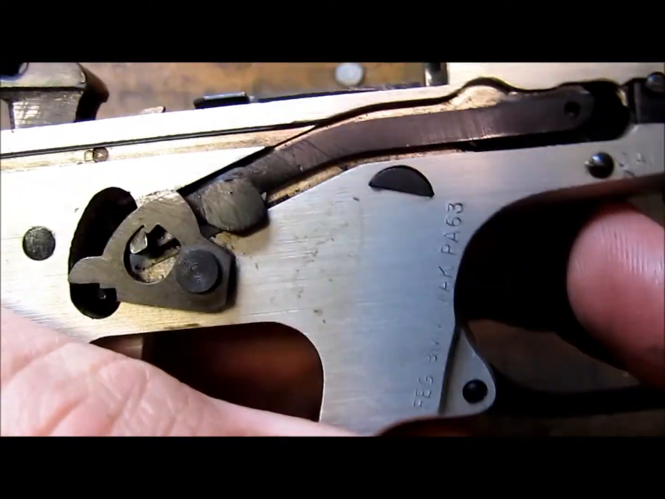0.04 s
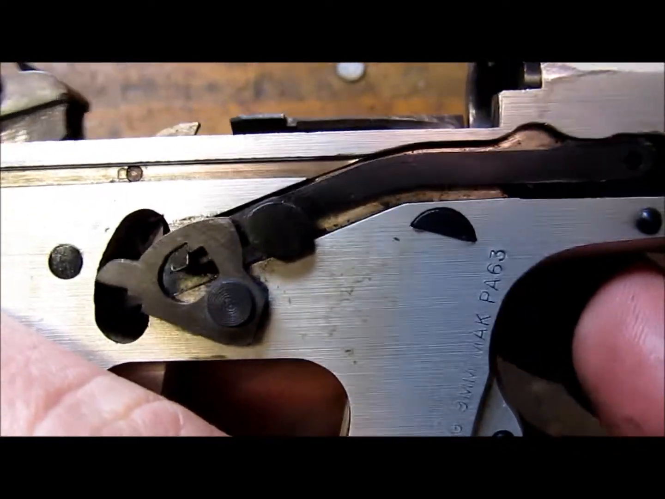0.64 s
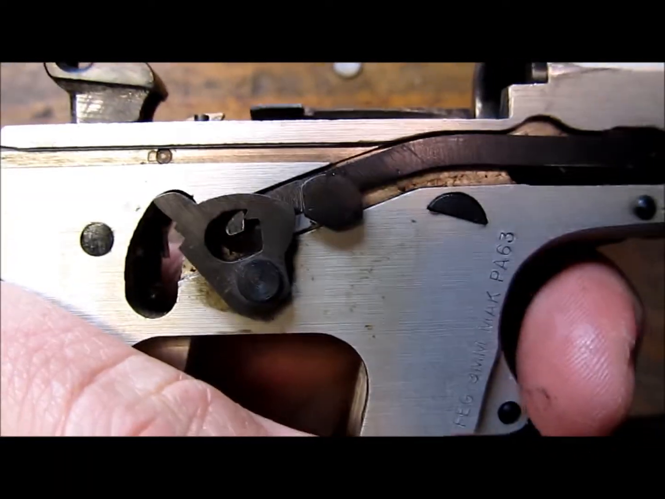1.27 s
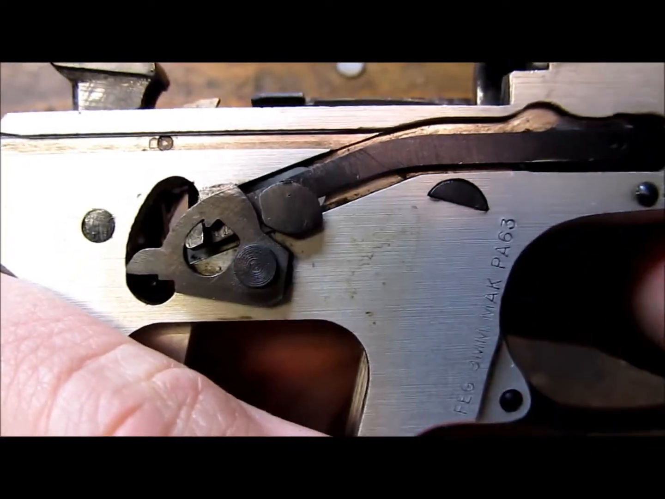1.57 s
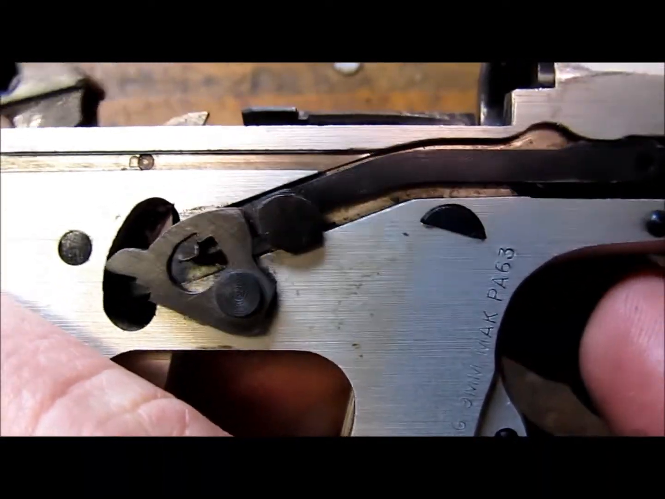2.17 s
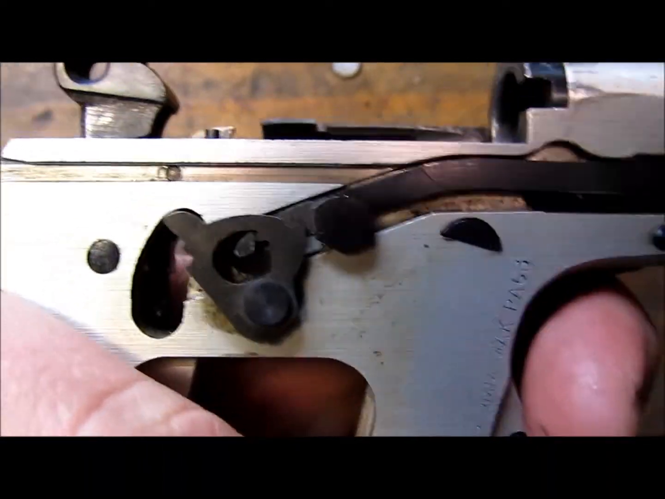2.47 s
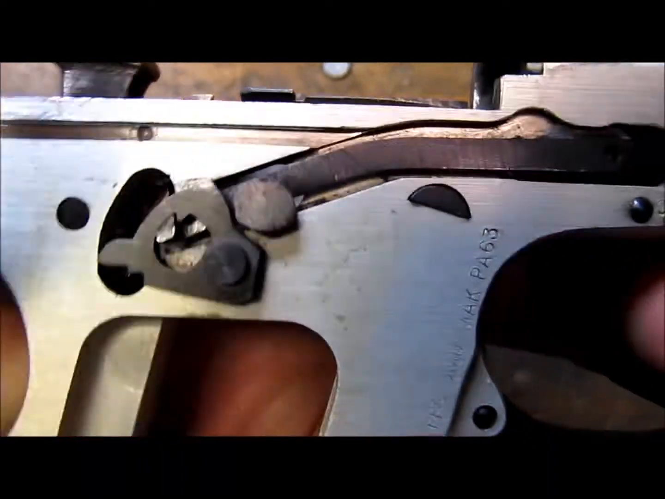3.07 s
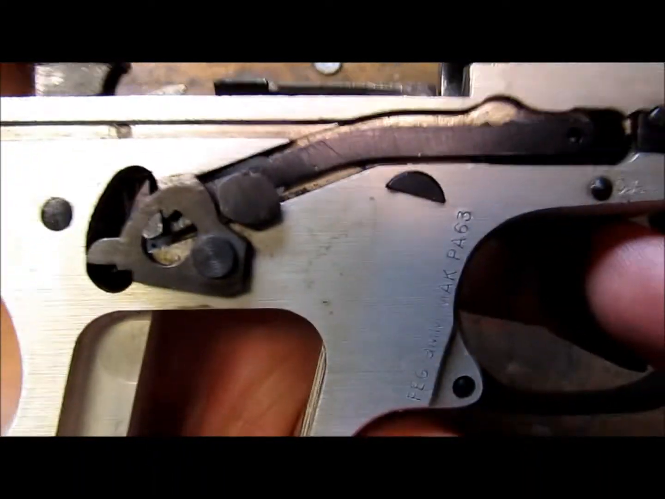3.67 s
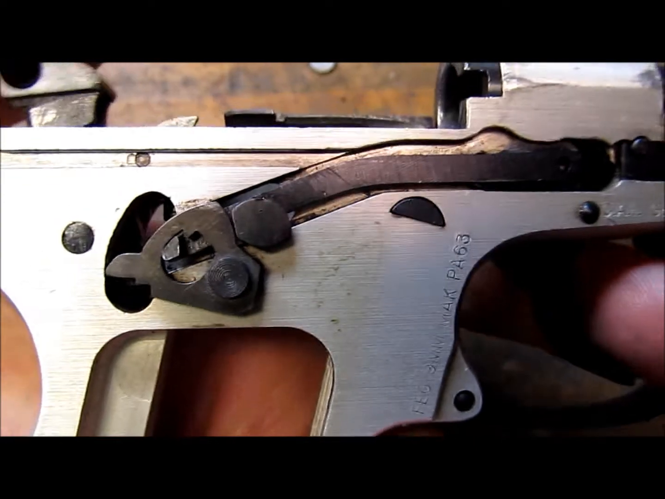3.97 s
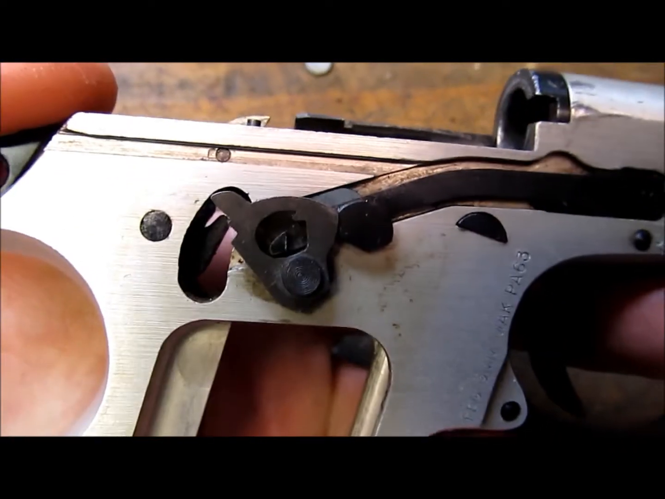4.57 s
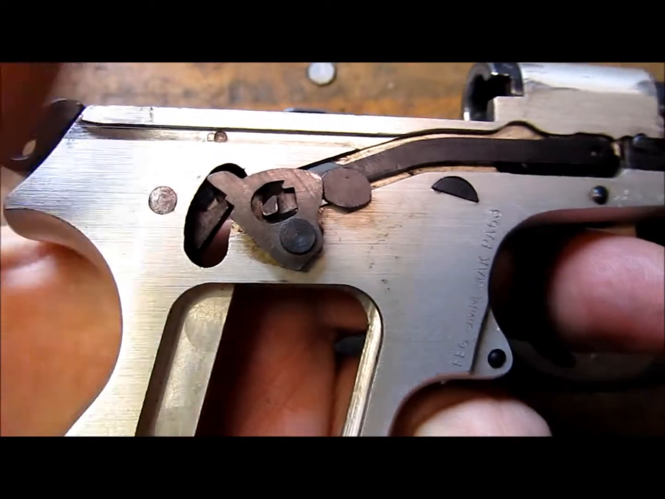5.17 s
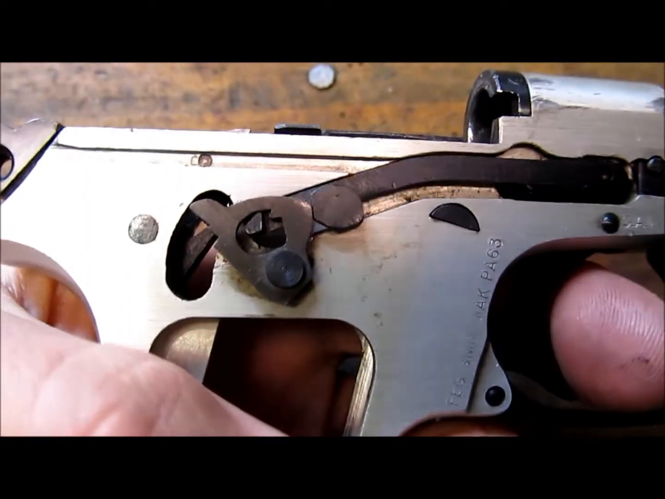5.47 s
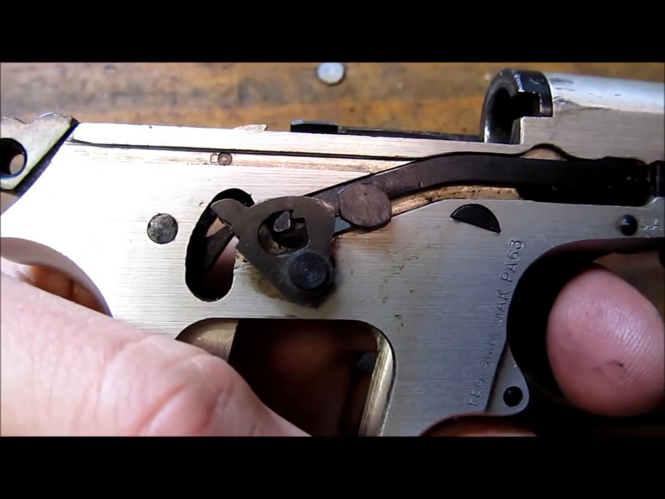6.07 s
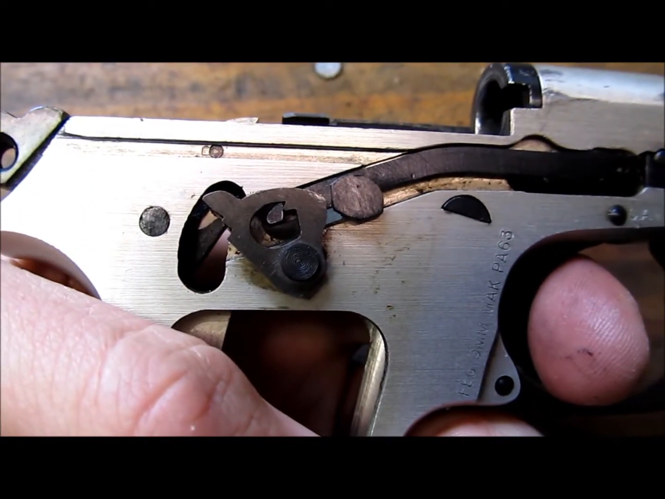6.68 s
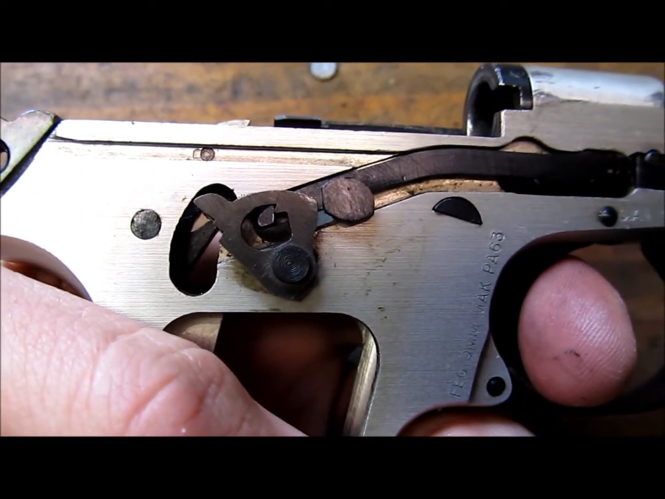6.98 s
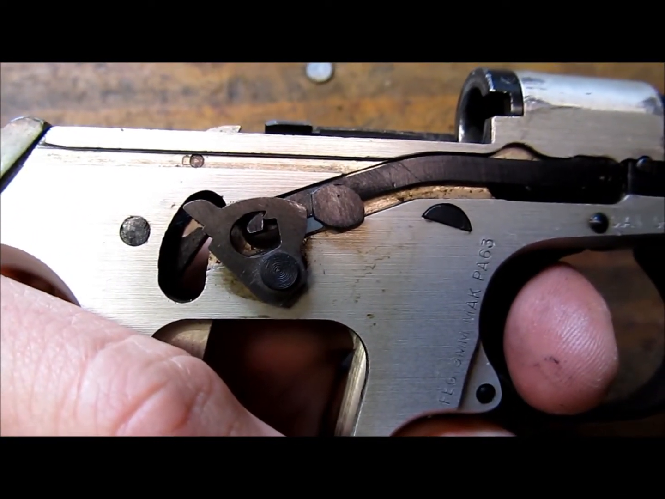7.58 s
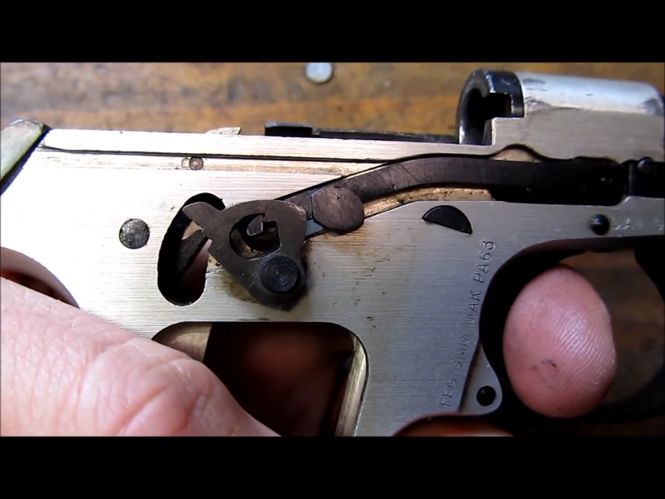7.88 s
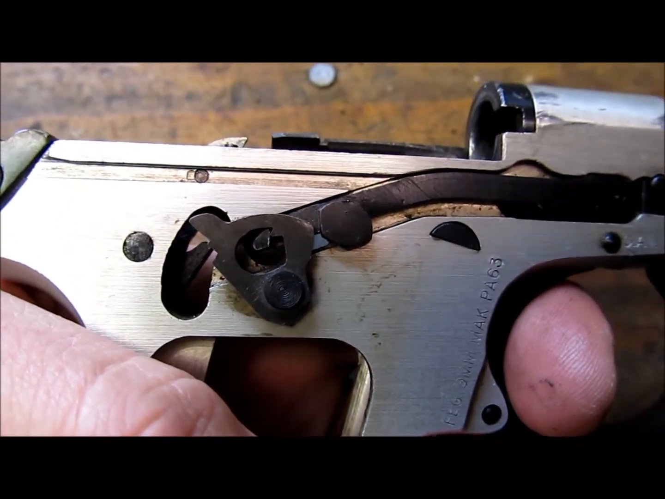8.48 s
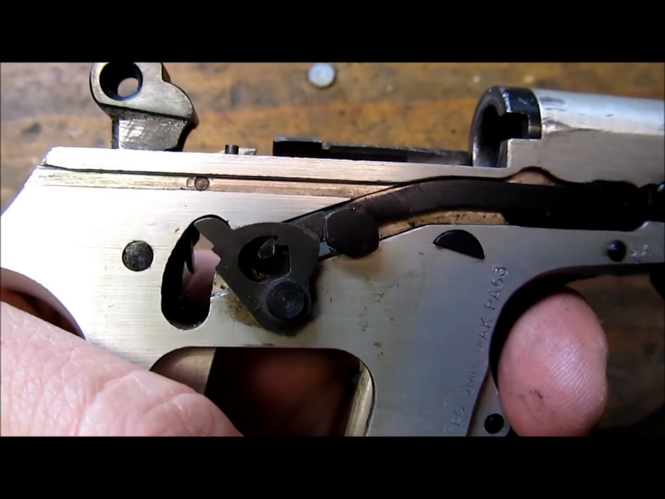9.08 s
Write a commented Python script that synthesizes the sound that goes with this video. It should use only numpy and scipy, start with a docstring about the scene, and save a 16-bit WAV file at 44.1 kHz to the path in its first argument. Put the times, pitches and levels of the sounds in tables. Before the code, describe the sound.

Sharp metallic snaps and small clicks of a pistol's trigger and hammer being worked by hand in a quiet, humming room.

```python
"""A small room, where a pistol's lockwork is worked by hand close to a camera. Trigger bar and sear
click, dry and steely, and the hammer falls three times: each blow jolts the gun, rattles its loose
parts and leaves the mainspring ringing. Under it lie faint slides of steel, soft bumps of the hand
and a bed of mains hum and hiss. The camera's gain control ducks at each loud snap and creeps back up."""
import sys
import numpy as np
from scipy import signal
from scipy.fft import rfft, irfft, next_fast_len
from scipy.io import wavfile
from scipy.ndimage import map_coordinates

SR = 44100
rng = np.random.default_rng(int(sys.argv[2]) if len(sys.argv) > 2 else 0)


def master(y):
    """Save y as 16-bit WAV."""
    cut = np.clip(np.atleast_2d(y).T, -1, 1)
    pcm = np.round(cut * 32767)  # scale
    wavfile.write(sys.argv[1], SR, pcm.astype(np.int16))


N = 411453

# The hero hits: the hammer lands after a long trigger "pull" or from full cock, "cocked".
# (time [s], action, jolt level [dB], jolt rise [s], knock level [dB])
HAMMER_FALLS = [(0.8277, "pull", 12, 0.00033, 0.5), (2.4368, "pull", 9, 0.0013, -3.5),
                (8.6422, "cocked", 12, 0.00014, -5.5)]
# Lead-in ticks for each action: the sear slips, and in a long pull the lever springs back with two more.
# (lead [s], level [dB], body [dB], treble [dB], ring [Hz], ring boost [dB])
SEAR_RELEASE = {"pull": [(0.011, -15, -15, 0.5, 11000, 8.5), (0.0062, -6.5, -6.5, -5, 4300, 10),
                (0.0032, -3, -10, 5, 4800, 8.5)], "cocked": [(0.0049, -7.5, -11, -9, 9500, 11)]}
# Spot clicks as the hammer is thumbed back and parts settle.
# (time [s], level [dB], body [dB], treble [dB], ring [Hz], ring boost [dB])
SPOT_CLICKS = [(1.836, -26, -9, -35, 5300, 6.5), (1.8794, -38.5, -13, -13, 5500, 2.5),
               (3.0877, -13, 5.5, -18, 3200, 9.5), (4.2576, -41, 2, -11.5, 6100, 3.5),
               (4.3866, 1, -6, 1.5, 9500, 12.5), (4.8468, -21, -9, -23, 4300, 2),
               (5.5615, -39, -7, -5, 8500, 6), (5.5876, -19, -25, -8, 9400, 7.5)]
def lockwork(blow_db=8.5, blow_body_db=6, blow_treble_db=-3.5, blow_ring_hz=5500):
    """Steel meets steel: spot clicks, then each fall's release and the hammer's face on the frame."""
    track = np.zeros((2, N))
    hits = list(SPOT_CLICKS)
    for start, action, *_ in HAMMER_FALLS:
        hits += [(start - lead, *voice) for lead, *voice in SEAR_RELEASE[action]]
        hits.append((start, blow_db, blow_body_db, blow_treble_db, blow_ring_hz))
    for start, db, *voice in hits:
        add(track, start, in_room(amp(db) * contact(*voice)))
    return track


# The steel frame's modes, choked by the hand: (pitch [Hz], level [dB], t60 [s])
FRAME_MODES = [(1240, -6.5, 0.0056), (2150, -8.5, 0.0016), (3210, 0.5, 0.0033), (4783, -4.5, 0.0076),
               (5590, 1.5, 0.0077), (6700, -8.5, 0.012), (7390, -3.5, 0.011), (8930, 1.5, 0.0064),
               (10670, -4, 0.011), (12420, -5.5, 0.0021), (14500, -6.5, 0.0013)]
def contact(body_db, treble_db, ring_hz, ring_db=6, crack_db=6, crack_t60=0.011, rise_s=0.00015):
    """One steel click: a gritty crack and the frame's brief ring, in a different phase at each mic."""
    t = seconds(.05)
    click = amp(crack_db) * fade(t, crack_t60) * close_noise(t)
    for hz, db, t60 in FRAME_MODES:
        phase = rng.uniform(0, 2 * np.pi) + hz / 6000 * rng.standard_normal((2, 1))
        scatter_db, detune = rng.normal(0, 2), rng.normal(1, .02)
        click += amp(db + scatter_db) * fade(t, t60) * np.sin(2 * np.pi * hz * detune * t + phase)
    click *= 1 - np.exp(-t / rise_s)
    # heavy blows have more body, sharp edges more treble, and the struck part boosts its own band
    tilt = [(50, body_db - 10.5), (200, body_db - 6.5), (1000, body_db), (3000, 0), (8000, 0.0013),
            (13000, treble_db), (16000, treble_db - 9)]
    boost = lambda hz: ring_db / (1 + (np.log((hz + 1) / ring_hz) / 0.11) ** 2)
    click = causal_eq(click, lambda hz: curve(tilt, hz) + boost(hz))
    return click / np.sqrt(np.sum(click ** 2) / (2 * .004 * SR))  # the energy of 4 ms at rms 1


# Bright rattle of shaken parts: (frequency [Hz], relative level [dB])
RATTLE_EQ = [(200, -18), (1200, -12.5), (3000, -7), (5200, -2), (7000, 2.5), (8200, -4.5), (10000, -5),
             (15500, -13)]
def hammer_shake(knock_hz=370, rattle_db=13.5, boom_hz=72, note_hz=1160, lag_s=0.00061):
    """The weight and tail of each fall: the whole gun jolts, loose parts rattle, the mainspring rings."""
    track, t = np.zeros((2, N)), seconds(.3)
    shaking = fade(t, t60=0.085) * (1 - np.exp(-t / 0.0055))
    boom = amp(-29) * fade(t, t60=0.27) * np.sin(2 * np.pi * boom_hz * t)  # the bench's low resonance, booming on after the blow
    steel_note = amp(-35.5) * fade(t, t60=0.18) * np.sin(2 * np.pi * note_hz * t)
    for start, _, jolt_db, rise, knock_db in HAMMER_FALLS:
        pulse = -t / rise * np.exp(1 - t / rise)
        jolt = amp(jolt_db) * pulse * amp([[1], [-1]])  # leans left
        knock = amp(knock_db) * fade(t, t60=0.02) * dull_noise(t, knock_hz, width=1.0)
        rattle = amp(rattle_db) * shaking * chatter(t, RATTLE_EQ, uneven_db=0)
        add(track, start + lag_s, jolt + knock + rattle + boom + steel_note)
        add(track, start, mainspring())
    return track


# The mainspring's shimmer: (frequency [Hz], relative level [dB])
SPRING_EQ = [(880, -70.5), (1500, -44.5), (2240, -31), (2570, -34.5), (2720, -20), (3250, -15),
             (3910, -13.5), (5610, -2.5), (6820, -3.5), (8130, -5), (10200, -9), (15500, -20.5)]
# Tail length of the spring, shared by the walls: (frequency [Hz], t60 [s])
TAIL_TIMES = [(500, .35), (3000, .48), (6000, .55), (9000, .41), (15000, .35)]
def mainspring(level_db=-9.5):
    """The jarred spring rings in modes so dense that they blur into bright, dying noise."""
    return amp(level_db) * filtered(dying_noise(TAIL_TIMES), lambda hz: unit(amp(curve(SPRING_EQ, hz))))


# The trigger is let go and its bar runs forward: (time it snaps home [s], travel [s], trim [dB])
BAR_RETURNS = [(1.5302, 0.0905, 1.5), (3.0102, 0.068, 0), (9.352, 0.0675, -4)]
# The bar catches on the same edges every time: (travel still to go [fraction], relative level [dB])
BAR_CATCHES = [(1, -9), (0.9, -13), (0.78, -7), (0.545, 0), (0.35, -12), (0.12, -11)]
# The bar's own tone on the snap: (frequency [Hz], gain [dB])
BAR_EQ = [(300, 8), (700, -9.5), (1400, 0.5), (2100, 6.5), (2900, -4.5), (4300, -3.5), (5800, -0.5),
          (8000, -4)]
def trigger_return(catch_db=-24.5, snap_db=-1.5, rebound_s=0.00073):
    """The bar ticks over its edges, then snaps home with a quick rebound that comb-filters the click."""
    track = np.zeros((2, N))
    comb = lambda hz: 1 - .7 * np.exp(-2j * np.pi * hz * rebound_s)
    for home, travel, trim_db in BAR_RETURNS:
        for to_go, db in BAR_CATCHES:
            tick = contact(body_db=-4, treble_db=0, ring_hz=5500)
            add(track, home - to_go * travel, in_room(amp(trim_db + catch_db + db) * tick))
        snap = contact(body_db=-15.5, treble_db=4.5, ring_hz=5900)
        snap = causal_eq(snap, lambda hz: curve(BAR_EQ, hz))
        add(track, home, in_room(amp(trim_db + snap_db) * snap, comb))
    return track


# Grit of steel on steel: (frequency [Hz], relative level [dB])
GRIT_EQ = [(1500, 1), (4000, 3), (7500, 6.5), (11000, -9.5), (15500, -16)]
def sliding_steel(draw_at_s=3.932, draw_length_s=0.35, draw_db=-59.5, bar_db=-43):
    """Faint friction swells and fades as the hammer is drawn back once, and on each return of the bar."""
    track = np.zeros((2, N))
    strokes = [(draw_at_s, draw_length_s, draw_db)]
    strokes += [(home - travel, travel, bar_db) for home, travel, _ in BAR_RETURNS]
    for start, length, db in strokes:
        t = seconds(length)
        swell = np.sqrt(np.sin(np.pi * t / length))
        add(track, start, amp(db) * swell * chatter(t, GRIT_EQ, uneven_db=14, rate_hz=480))
    return track


# Handling thuds: (time [s], level [dB], pitch [Hz], t60 [s])
GRIP_BUMPS = [(3.088, -26, 490, 0.1), (4.851, -33, 130, 0.07), (5.019, -37.5, 128, 0.088),
              (8.462, -44, 124.6, 0.18), (8.54, -47, 143, 0.11)]
def hand_bumps(rise_s=0.00033):
    """Soft, dull bumps of the hand on the grip."""
    track, t = np.zeros((2, N)), seconds(.2)
    for start, db, pitch_hz, t60 in GRIP_BUMPS:
        envelope = fade(t, t60) * (1 - np.exp(-t / rise_s))
        add(track, start, amp(db) * envelope * dull_noise(t, pitch_hz, width=.5))
    return track


def in_room(click, direct_tone=lambda hz: 1, right_bias_db=3.5, bench_db=-15, walls_db=-30, gap_s=0.0033):
    """Sets a click nearer the right mic; bench and hands slap back, the walls add a faint, longer tail."""
    panned = click * amp([[-right_bias_db / 2], [right_bias_db / 2]])
    bench = dying_noise([(1000, .08)])  # an 80 ms tail at every frequency
    walls = dying_noise(TAIL_TIMES)
    echo = amp(bench_db) * bench / np.linalg.norm(bench[0])
    echo += amp(walls_db) * walls / np.linalg.norm(walls[0])
    sound = signal.fftconvolve(panned, np.pad(echo, ((0, 0), (round(gap_s * SR), 0))), axes=1)
    add(sound, 0, filtered(panned, direct_tone))
    return sound


# The hum bed: (pitch [Hz], rms level [dB])
MAINS_HARMONICS = [(120, -63), (180, -73), (240, -56), (360, -56), (480, -58.5), (600, -72), (720, -78),
                   (960, -71.5), (1080, -76.5)]
def mains_hum(waver_db=.5, waver_rate_hz=4):
    """Mains harmonics, dead centre, each wavering slightly in level."""
    hum, t = np.zeros(N), np.arange(N) / SR
    for hz, db in MAINS_HARMONICS:
        waver = map_coordinates(rng.standard_normal(40), [t * waver_rate_hz])
        hum += np.sqrt(2) * amp(db + waver_db * waver) * np.sin(2 * np.pi * (hz * t + rng.random()))
    return hum


# Room tone and mic hiss: (frequency [Hz], density [dB per Hz])
AIR_SPECTRUM = [(20, -98.5), (60, -83.5), (120, -82), (300, -81.5), (500, -84), (1000, -89.5),
                (2000, -91.5), (3200, -94.5), (4500, -98), (6500, -102), (8000, -104), (13500, -105),
                (14700, -118)]
# How centred the air sits: (frequency [Hz], left-right correlation [ratio])
AIR_CORRELATION = [(60, 0.56), (290, 0.07), (640, 0.17), (1400, 0.21), (3000, 0.16)]
def room_air():
    """Room air and microphone hiss, fairly centred in the bass and wide above it."""
    def mid_side_gains(hz):
        angle = np.arccos(np.clip(curve(AIR_CORRELATION, hz), -1, 1)) / 2
        return amp(curve(AIR_SPECTRUM, hz)) * np.array([np.cos(angle), np.sin(angle)])
    mid, side = filtered(white_bed(), mid_side_gains)
    return np.array([mid + side, mid - side])


# Peaks of the whirr: (centre [Hz], half-width [Hz], left density [dB per Hz], right density [dB per Hz])
WHIRR_PEAKS = [(1230, 720, -87, -102), (1770, 220, -84, -102), (2350, 390, -78, -101),
               (3100, 190, -85.5, -90.5), (3660, 210, -86.5, -100), (4940, 270, -87.5, -106),
               (5500, 280, -86, -91), (5730, 250, -83.5, -101), (11950, 800, -101, -115)]
def whirr():
    """A thin, steady whirr of noise in narrow resonances, mostly on the left."""
    def resonances(hz):
        peaks = [amp([[left], [right]]) / (1 + ((hz - centre) / width) ** 2)
                 for centre, width, left, right in WHIRR_PEAKS]
        return np.sqrt(sum(peak ** 2 for peak in peaks))
    return filtered(white_bed(), resonances)


def white_bed():
    """Scene-long stereo white noise at 0 dB per Hz."""
    return np.sqrt(SR / 2) * rng.standard_normal((2, N))


def close_noise(t, widen_hz=3000):
    """Noise from close by: the two mics agree in the bass and part in the treble."""
    mid, side = rng.standard_normal((2, len(t)))
    side = filtered(side, lambda hz: hz / np.hypot(hz, widen_hz))
    return unit(np.array([mid + side, mid - side]))


def chatter(t, spectrum, uneven_db, rate_hz=900):
    """A wash of tiny collisions at rms 1; more uneven_db makes it grainier."""
    grain = amp(uneven_db * map_coordinates(rng.standard_normal(1000), [t * rate_hz], order=1))
    return unit(filtered(grain * close_noise(t), lambda hz: amp(curve(spectrum, hz))))


def dull_noise(t, pitch_hz, width):
    """A mono band of noise around pitch_hz, at rms 1."""
    band = lambda hz: 1 / (1 + (np.log((hz + 1) / pitch_hz) / width) ** 4)
    return unit(filtered(rng.standard_normal(len(t)), band))


def dying_noise(t60s):
    """A stereo noise tail in which each frequency dies at its own speed."""
    hz, t, spectrum = signal.stft(rng.standard_normal((2, SR)), SR, nperseg=256)
    return signal.istft(spectrum * fade(t, curve(t60s, hz)[:, None]), SR, nperseg=256)[1]


def amp(db):
    """Decibels to gain."""
    return 10 ** (np.asarray(db) / 20)


def unit(x):
    """x at rms 1."""
    return x / np.sqrt(np.mean(x ** 2) + 1e-20)


def curve(points, hz):
    """Reads (frequency [Hz], value) breakpoints on a log frequency axis."""
    frequencies, values = np.transpose(points)
    return np.interp(np.log(hz + 1), np.log(frequencies + 1), values)


def seconds(length):
    """Sample times over a length in seconds."""
    return np.arange(int(length * SR)) / SR


def fade(t, t60):
    """Exponential decay, 60 dB down after t60."""
    return np.exp(-np.log(1000) * t / t60)


def add(track, start, sound):
    """Mixes a sound into the stereo track at start [s]."""
    part = track[:, round(start * SR):][:, :sound.shape[-1]]
    part += sound[..., :part.shape[1]]


def filtered(x, response):
    """x through a filter given as gain against frequency."""
    n = x.shape[-1]
    size = next_fast_len(n + SR // 10)
    return irfft(rfft(x, size) * response(np.fft.rfftfreq(size, 1 / SR)), size)[..., :n]


def causal_eq(x, gain_db, size=8192):
    """Minimum-phase EQ for a short sound: nothing rings ahead of the attack."""
    cepstrum = irfft(np.log(amp(gain_db(np.fft.rfftfreq(size, 1 / SR)))))
    cepstrum[1:size // 2] *= 2
    cepstrum[size // 2 + 1:] = 0
    return irfft(rfft(x, size) * np.exp(rfft(cepstrum)))[..., :x.shape[-1]]


def smoothed(x, time_s):
    """One-pole smoothing with time constant time_s."""
    step = 1 / (time_s * SR)
    return signal.lfilter([step], [1, step - 1], x)


def scene():
    """The gun in the hand, over the room's bed of hum and hiss."""
    gun = lockwork() + trigger_return() + hammer_shake() + sliding_steel()
    return gun + hand_bumps() + mains_hum() + room_air() + whirr()


def microphone(hz, notch_hz=7900, width_hz=350, depth=0.2, bass_cut_hz=22):
    """The mic ports cut a shallow, narrow notch and roll off the deepest bass."""
    resonance = 1j * hz * width_hz / (notch_hz ** 2 - hz ** 2 + 1j * hz * width_hz)
    return (1 - depth * resonance) * 1j * hz / (1j * hz + bass_cut_hz)


def gain_control(x, threshold_db=-24, averaging_s=0.014, attack_s=0.0036, release_s=1.27, slack_db=2):
    """Loud sounds duck the gain within milliseconds; it creeps back over seconds."""
    power = smoothed(np.mean(x ** 2, axis=0), averaging_s)
    excess_db = np.maximum(10 * np.log10(power + 1e-12) - threshold_db, 0)
    leak = np.exp(-np.arange(N) / SR / release_s)
    held_db = leak * np.maximum.accumulate(excess_db / leak)  # each peak is held and leaks away
    duck_db = smoothed(np.maximum(held_db - slack_db, 0), attack_s)
    return x * amp(-duck_db)


def record(dry, ceiling=.9, hardness=4, top_hz=16050):
    """The camera's chain: mic colour, gain control, soft clip and a steep high cut."""
    ducked = gain_control(filtered(dry, microphone))
    rounded = ducked / (1 + np.abs(ducked / ceiling) ** hardness) ** (1 / hardness)
    return filtered(rounded, lambda hz: 1 / np.sqrt(1 + (hz / top_hz) ** 160))


dry = scene()
out = record(dry)
master(out)
```